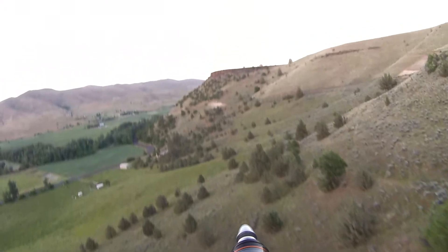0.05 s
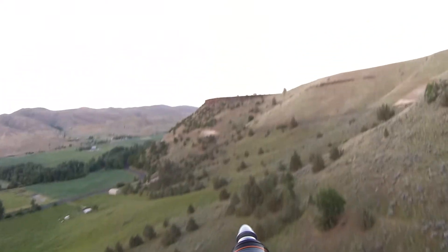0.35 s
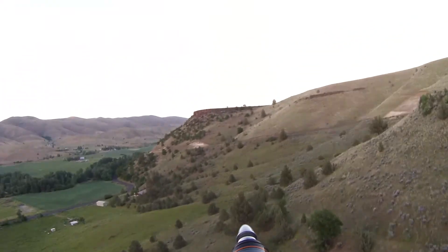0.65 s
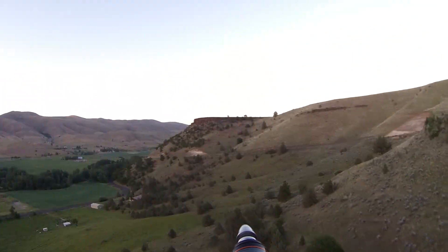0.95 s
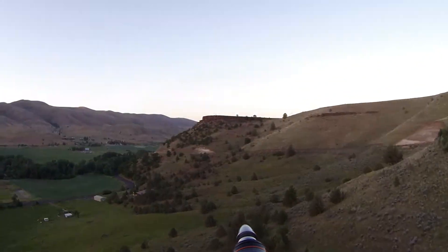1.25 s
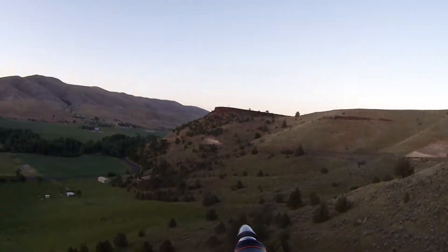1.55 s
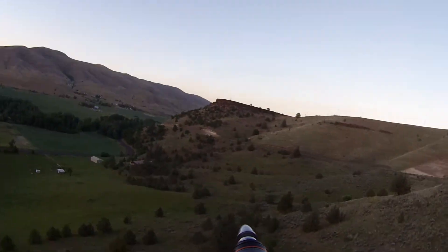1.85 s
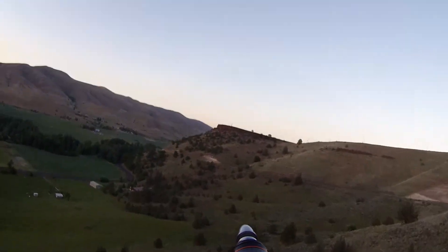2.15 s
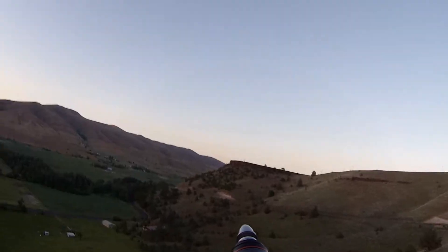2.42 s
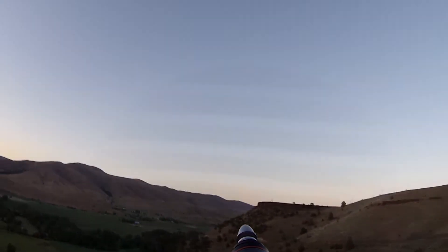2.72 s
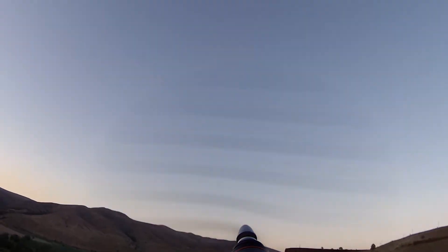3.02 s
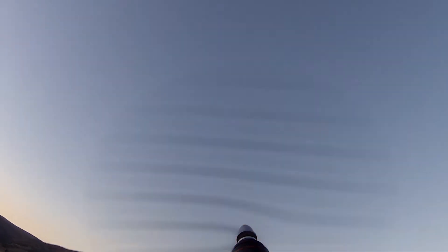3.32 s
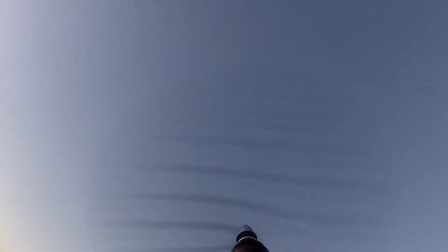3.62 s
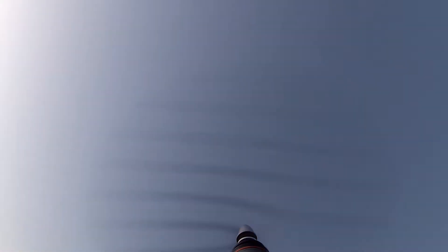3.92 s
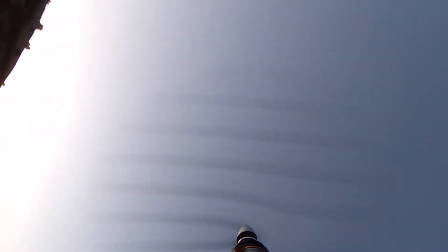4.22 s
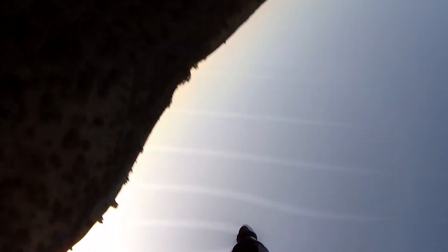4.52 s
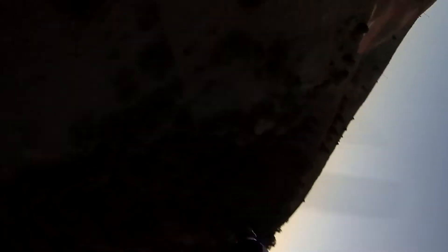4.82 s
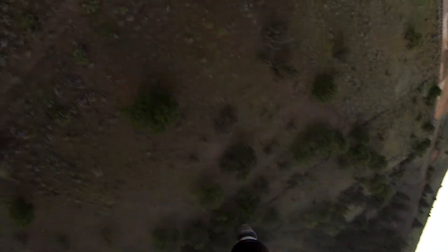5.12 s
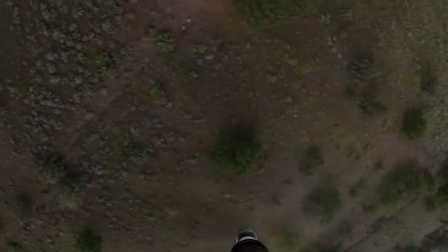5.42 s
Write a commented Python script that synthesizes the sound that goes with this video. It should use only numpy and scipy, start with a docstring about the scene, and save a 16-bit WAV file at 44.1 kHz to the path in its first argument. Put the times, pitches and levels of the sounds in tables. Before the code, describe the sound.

A small electric model plane is heard from on board, just behind its propeller. The motor holds a steady buzzing drone over hissing, rushing air, sagging slightly in pitch and turning duller and rougher as the wind grows. Then the throttle is cut and the buzz slides down to a low hum, while gusts buffet the microphone with rumbling thumps and pops.

```python
"""The two-bladed propeller of a small electric model aircraft, heard from the fuselage just behind it.
Each passing blade sends out a pressure pulse, and the turbulent slipstream rushes over the microphone.
In a climb the loaded propeller shakes the frame. Then the throttle is cut, the motor winds down
with a faint whine, and gusts and eddies buffet the microphone as the plane rolls into a dive."""
import sys
import numpy as np
from scipy import signal
from scipy.fft import rfft, irfft, next_fast_len
from scipy.io import wavfile
from scipy.ndimage import uniform_filter1d

SR = 44100
rng = np.random.default_rng(int(sys.argv[2]) if len(sys.argv) > 2 else 0)


def transcribe(u):
    """Save the signal u as a 16-bit wav file named by the first command-line argument.

    u: samples, shape (n,) or (channels, n), limited to [-1, 1]; the rate is SR.
    q: integer samples, one column per channel.
    """
    v = np.clip(np.atleast_2d(u).T, -1, 1)
    q = np.round(v * 32767).astype(np.int16)
    wavfile.write(sys.argv[1], SR, q)


N = 250047
TIME = np.arange(N) / SR

# propeller speed, sagging in the climb, coasting down, then picking up: (time [s], blade-pass rate [Hz])
BLADE_RATE = [(0.0, 270.4), (0.8, 266.7), (0.84, 268.8), (0.9, 264.5), (1.68, 261.3), (1.76, 263.8),
              (1.84, 261.1), (2.0, 263.6), (3.13, 257.3), (3.71, 252.1), (3.75, 249.5), (4.43, 243.6),
              (4.59, 193.9), (4.67, 173), (4.87, 140.5), (4.95, 123.4), (5.05, 108.8), (5.23, 92.9),
              (5.55, 90.17), (5.67, 106.6)]
CRUISE_HZ = 260


def undb(db):
    """Amplitude ratio of a level in decibels."""
    return 10 ** (np.asarray(db) / 20)


def curves(table):
    """Linear interpolation of each column over time."""
    times, *columns = np.transpose(table)
    return [np.interp(TIME, times, column) for column in columns]


def unit(x):
    """Normalisation to rms 1."""
    return x / np.sqrt(np.mean(x ** 2))


def colour(x, points):
    """Spectral shaping by (frequency [Hz], relative level [dB]) points; rms 1."""
    hz, db = np.transpose(points)
    size = next_fast_len(N + SR // 10)
    bins = np.maximum(np.fft.rfftfreq(size, 1 / SR), 1)
    gain = undb(np.interp(np.log(bins), np.log(hz), db))
    return unit(irfft(rfft(x, size) * gain, size)[:N])


def walk(rate):
    """Smooth random fluctuation, about rate changes a second; rms 1."""
    hold = max(int(SR / rate), 2)
    steps = np.repeat(rng.standard_normal(N)[:N // hold + 2], hold)
    return unit(uniform_filter1d(uniform_filter1d(steps, hold), hold)[:N])


def spell(start, attack, end, release):
    """Trapezoidal envelope 0-1: rise, hold until the end, release; times in seconds."""
    return np.clip((TIME - start) / attack, 0, 1) * np.clip(1 - (TIME - end) / release, 0, 1)


def swell(peak, rise, fall):
    """Exponential growth to 1 at the peak, then exponential decay; times in seconds."""
    return np.exp(-np.maximum((peak - TIME) / rise, (TIME - peak) / fall))


def octaves():
    """Propeller speed relative to cruise, in octaves."""
    return np.log2(curves(BLADE_RATE)[0] / CRUISE_HZ)


def overspeed():
    """Excess of the blade-pass rate over cruise, in Hz."""
    return np.maximum(curves(BLADE_RATE)[0] - CRUISE_HZ, 0)


def propeller(phase, cruise_db=-14.5, jitter_cycles=0.013, rolloff_db=-6.5, skew_rad=0.82):
    """Periodic suction pulses form a harmonic series; what repeats once a turn adds lines in between."""
    # pulse sharpness, blunted in the climb: (time [s], third harmonic relative to the blade level [dB])
    sharpness = [(0, -11), (1.9, -13.5), (3.0, -18.5), (3.5, -21.5), (4.15, -34.5), (4.55, -32.5),
                 (4.78, -22.5), (5.05, -18), (5.3, -10), (5.67, -26)]
    sharp_db, = curves(sharpness)
    strain = spell(3.65, 0.22, 4.6, 0.29)  # the loaded propeller shakes the frame
    tone_dip = spell(5.02, 0.24, 5.28, 0.12)  # the propeller tone ducks under the loud wind buffeting
    uneven = 0.2 + 0.042 * overspeed()  # fractional difference between the two blades' pulses
    blade_db = cruise_db + 2.7 * octaves()
    # turbulence makes every pulse a little different in timing and level
    angle = 2 * np.pi * (phase + jitter_cycles * walk(170))
    fundamental_db = blade_db - 10.5 * tone_dip - 2 * uneven ** 2 + 0.85 * walk(70)
    fundamental = undb(fundamental_db) * np.cos(angle)
    second = undb(blade_db - 3.5 + 0.35 * sharp_db) * np.cos(2 * angle)
    # the higher harmonics line up into a narrow, slightly lopsided pulse
    edge = np.zeros(N)
    for k in range(3, 9):
        edge += undb(blade_db + sharp_db + rolloff_db * (k - 3)) * np.cos(k * angle + skew_rad * (k - 2))
    turn = np.cos(angle / 2)
    overtones = second + edge * (1 + uneven * turn)  # every other pulse is sharper
    overtones *= undb(-0.5 * walk(120))
    wobble = undb(-29) * spell(2.04, 2.1, 4.58, 0.37) * turn  # the shaft wobbles as the climb steepens
    # the frame vibrates at odd multiples of the shaft rate
    shake = undb(-8) * turn + np.cos(1.5 * angle + 1) + undb(-12.5) * np.cos(2.5 * angle + 2)
    shake_db = -41.5 + 16 * strain + 20 * uneven ** 2 + 0.59 * walk(25)
    return -np.sqrt(2) * (fundamental + wobble + overtones + undb(shake_db) * shake)


def wind(phase, cruise_air_db=-46, settle_s=0.21, flutter=0.89, chop=0.45, crackle_db=2.5, ticks_per_s=260):
    """Turbulent pressure is broadband noise: large eddies buffet and rush, small ones hiss and sizzle."""
    # strength of the airflow's hiss at the microphone: (time [s], relative level [dB])
    airflow = [(0.0, -39.5), (0.22, -41), (0.54, -40), (1.04, -46.5), (2.04, -49), (2.2, -42), (2.5, -42.5),
               (4.11, -50.6), (4.17, -48.5), (4.27, -51), (4.35, -44.5), (4.49, -49), (4.97, -65.5),
               (5.25, -56.5), (5.33, -55.5), (5.49, -59.5), (5.57, -54.1), (5.67, -53)]
    # spectra of the four noise bands: (frequency [Hz], relative spectral level [dB])
    buffet_spectrum = [(15, -8.5), (35, -0.5), (70, 0.5), (130, -1.5), (220, -1.5), (400, -6), (700, -15),
                       (1400, -31.5), (2200, -51), (3000, -59), (8000, -110)]
    rush_spectrum = [(10, -30.5), (100, 2), (350, 0.5), (700, -3.5), (1100, -7.5), (1600, -13), (2300, -20),
                     (3500, -31), (7000, -60.5), (15000, -92)]
    hiss_spectrum = [(300, -24.5), (1500, 4), (2800, 4.5), (4200, 2), (6000, -5.5), (8500, -16),
                     (12000, -27), (15000, -43)]
    sizzle_spectrum = [(3000, -16.5), (5500, 3), (9000, -4.5), (15000, -16.5)]
    # gusts across the microphone port:
    # (peak time [s], rise [s], fall [s], buffet level [dB], sizzle level [dB])
    gusts = [(2.6, .45, 0.71, -27, -67), (3.95, .4, 0.74, -22.5, -75.5), (5.28, 0.35, 0.17, -16.5, -60),
             (5.34, 0.045, 0.075, -16.5, -71), (5.555, 0.027, 0.33, -17.5, -76)]
    air_db = curves(airflow)[0] - cruise_air_db
    settled_db = uniform_filter1d(air_db, int(settle_s * SR))  # larger eddies follow the flow slowly
    slipstream_db = 1.9 * octaves() + 0.21 * overspeed()
    rush_gain = undb(-26 + 0.63 * settled_db + slipstream_db)
    buffet_gain = undb(-30.5 + 0.36 * air_db)
    sizzle_gain = undb(-69.5 + 1.4 * air_db)  # faster air is brighter
    # incoherent sources add in power; the sizzle grows with the square of the gust's speed
    for peak, rise, fall, buffet_db, sizzle_db in gusts:
        gust = swell(peak, rise, fall)
        buffet_gain = np.hypot(buffet_gain, undb(buffet_db) * gust)
        sizzle_gain = np.hypot(sizzle_gain, undb(sizzle_db) * gust ** 2)
    swirl = undb(flutter * walk(85))  # one eddy lifts buffet, rush and hiss together
    grain = flutter * walk(450)
    wake = 1 + chop * np.cos(2 * np.pi * phase + 1.8)  # the blade wakes chop the rush
    buffet = colour(rng.standard_normal(N) * swirl, buffet_spectrum)
    rush = colour(rng.standard_normal(N) * swirl * wake * undb(1.5 * grain), rush_spectrum)
    # the smallest eddies tick against the port, mostly weak, a few strong
    arrivals = rng.random(N) < ticks_per_s / SR
    ticks = arrivals * undb(6 * np.minimum(rng.exponential(size=N), 3))
    crackle = rng.standard_normal(N) * undb(crackle_db * grain)
    hiss = colour((unit(crackle) + undb(-9) * unit(ticks)) * swirl, hiss_spectrum)
    sizzle = colour(rng.standard_normal(N) * undb(crackle_db * walk(600)), sizzle_spectrum)
    # strong buffeting breaks up into separate thumps
    breakup = np.clip((20 * np.log10(buffet_gain) + 20) / 6, 0, 1)
    thumps = undb(4 * breakup * walk(70))
    low_bands = thumps * (buffet_gain * buffet + rush_gain * rush)
    # slow air sheds fewer small eddies: its hiss is duller
    dull_hiss = signal.sosfiltfilt(signal.butter(2, 2800, fs=SR, output="sos"), hiss)
    slowness = np.clip(-air_db / 20, 0, 1) ** 2
    hiss += slowness * (dull_hiss - hiss)
    return low_bands + undb(air_db - 48) * hiss + sizzle_gain * sizzle


def motor(phase, magnet_poles=14, whine_db=-60.5, switching_hz=7530, sideband_db=-3):
    """Commutation makes a whine; amplitude modulation gives the controller's switching tone sidebands."""
    # spells at part throttle, when the switching is heard:
    # (start [s], attack [s], end [s], release [s], level [dB])
    part_throttle = [(4.45, .2, 4.83, .06, -79), (5.53, .08, 5.7, .05, -71)]
    # resonances of the motor housing: (frequency [Hz], half-width [Hz], level [dB])
    housing_modes = [(4110, 100, -61), (10200, 600, -78)]
    load = swell(peak=4.33, rise=0.7, fall=0.13)
    pole_angle = 2 * np.pi * phase * magnet_poles / 2  # two blade passes to a turn
    whine = load * undb(whine_db + 2 * walk(30)) * np.sin(3 * pole_angle + 0.8 * walk(220))
    switching_gain = sum(undb(db) * spell(*span) for *span, db in part_throttle)
    modulation = 1 + 2 * undb(sideband_db) * np.cos(pole_angle)
    switching = switching_gain * np.sin(2 * np.pi * switching_hz * TIME) * modulation
    # two high overtones of the rotor each sweep through a resonance as the motor slows
    blade_hz, = curves(BLADE_RATE)
    whistles = np.zeros(N)
    for order, (hz, half_width_hz, db) in zip((27, 54), housing_modes):
        response = 1 / (1 + ((order * blade_hz - hz) / half_width_hz) ** 2)
        whistles += undb(db) * response * np.sin(2 * np.pi * order * phase + walk(350))
    return whine + switching + whistles


def eddies():
    """Pressure transients: a strong eddy pops as a rounded peak between two shallow troughs."""
    # eddies bursting on the microphone: (time [s], level before rounding [dB], width [ms], rounding [ms])
    bursts = [(4.036, -8, 0.5, .03), (4.279, -15, 0.31, .05), (4.722, -9, .36, 0.055),
              (4.762, -7.5, 0.41, .06), (4.854, -18, .35, 0.077), (4.89, -13, .35, .09),
              (5.077, -12, 0.46, .08), (5.19, -5.5, 1.1, .09), (5.295, 0.5, 1.05, 0.12),
              (5.352, -0.5, 0.92, 0.14), (5.436, -2.5, 1.45, 0.0079), (5.468, -1, 0.54, 0.24),
              (5.51, -4.5, 1.1, .025), (5.542, -12, 0.73, 0.1), (5.558, -3.5, 0.29, 0.11),
              (5.589, -13, 1, .04)]
    pops = np.zeros(N)
    for time, db, width_ms, rounding_ms in bursts:
        offset_ms = 1000 * (TIME - time)
        distance = np.hypot(offset_ms, rounding_ms) / width_ms
        pops += undb(db) * (1 - distance / 2) * np.exp(-distance / 2)
    return pops


def scene(waver=0.002292):
    """Superposition of the sources; one shaft locks the blades, their wakes and the whine in phase."""
    blade_hz, = curves(BLADE_RATE)
    phase = np.cumsum(blade_hz * (1 + waver * walk(18))) / SR  # counted in blade passes
    return (propeller(phase) + wind(phase) + motor(phase) + eddies())[None]


def record(dry, low_hz=18, top_hz=15100):
    """Band limiting: the microphone drops the deepest rumble and the highest treble."""
    high_pass = signal.butter(2, low_hz, "high", fs=SR, output="sos")
    low_pass = signal.ellip(8, 0.2, 70, top_hz, fs=SR, output="sos")
    return signal.sosfilt(low_pass, signal.sosfilt(high_pass, dry))


dry = scene()
out = record(dry)
transcribe(out)
```